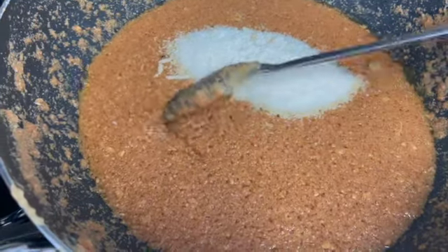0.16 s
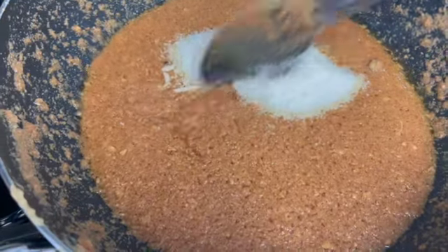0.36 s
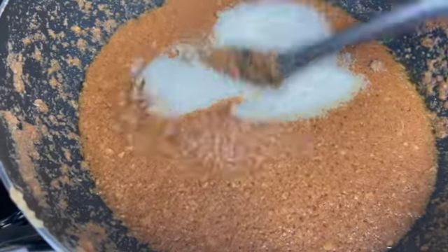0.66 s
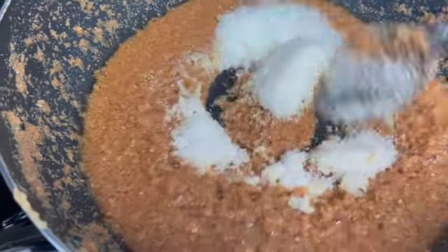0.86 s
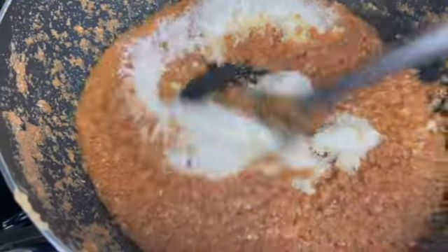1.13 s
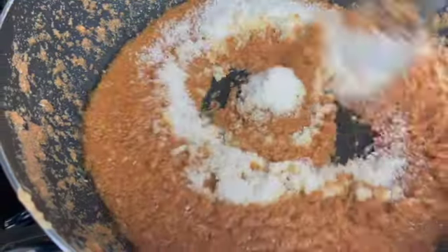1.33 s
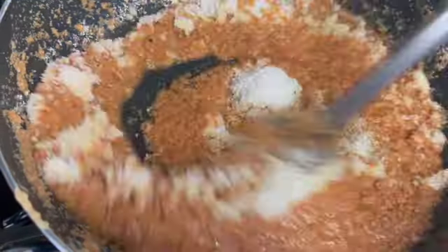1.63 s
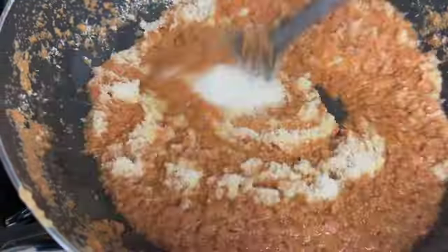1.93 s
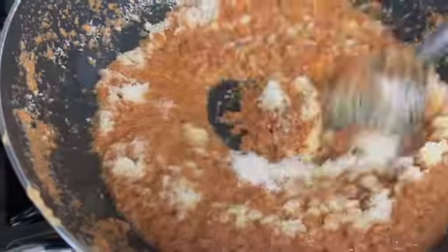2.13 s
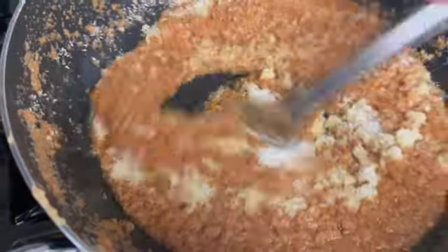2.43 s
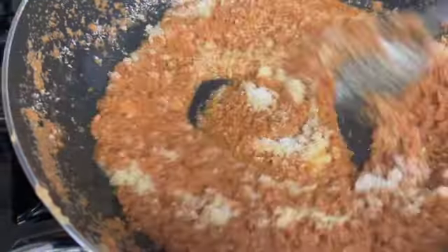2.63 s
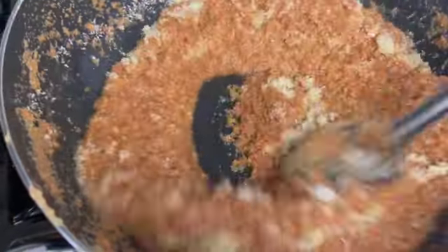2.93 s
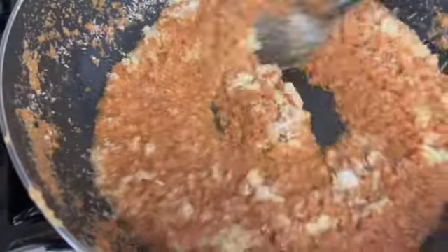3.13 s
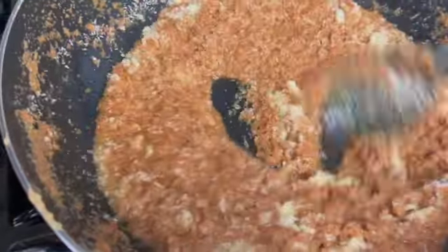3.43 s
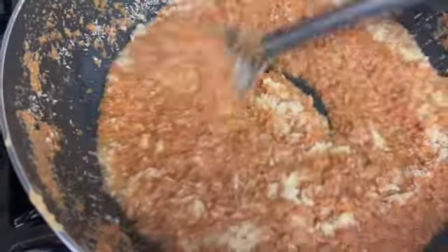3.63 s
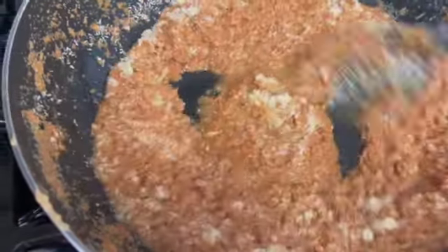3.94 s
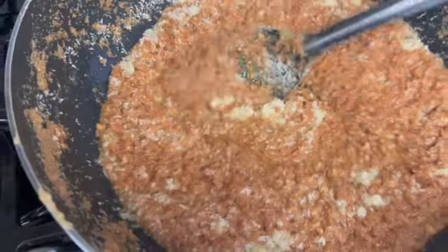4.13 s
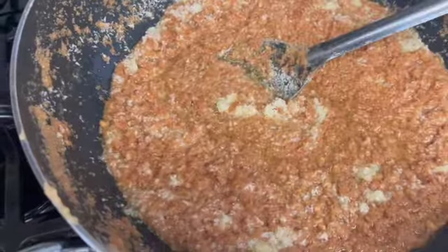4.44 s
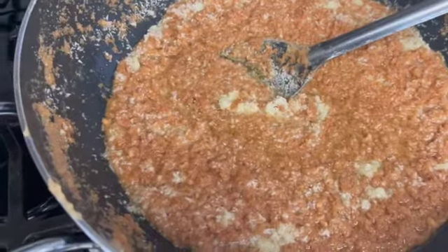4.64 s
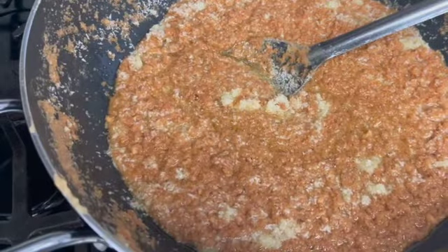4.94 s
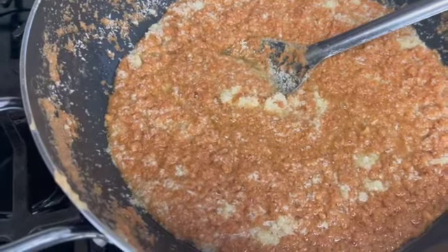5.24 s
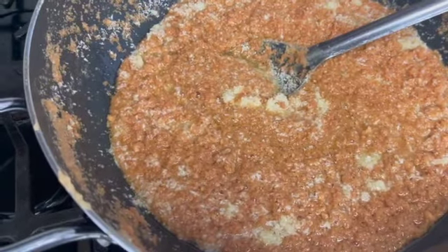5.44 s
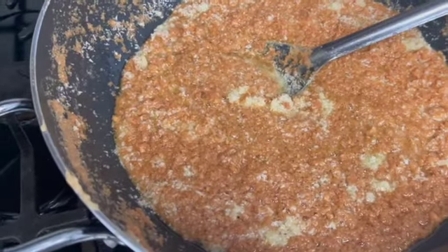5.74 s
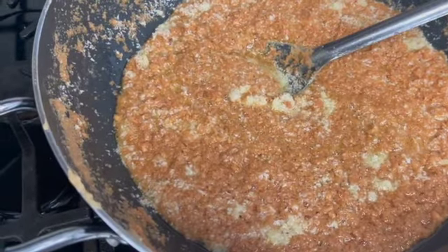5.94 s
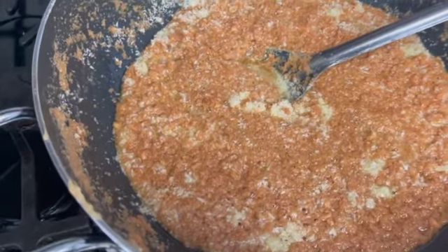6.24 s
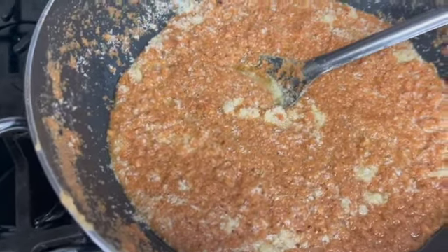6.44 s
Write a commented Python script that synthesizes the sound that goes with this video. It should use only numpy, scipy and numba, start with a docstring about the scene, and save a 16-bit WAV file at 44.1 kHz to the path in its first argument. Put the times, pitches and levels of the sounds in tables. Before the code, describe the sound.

Fat sizzles lightly throughout, with scattered tiny spits, heard close above a frying pan in a kitchen with short wall reflections. At about 0.4 seconds a metal spoon strikes the pan with a ringing clank. From 0.8 to 3.8 seconds it stirs a thick mixture in short, grainy scrapes, strongest around 1.5 seconds, with faint wet pops and a few light ticks. At 4.2 seconds the spoon drops against the pan with the loudest crack, bouncing briefly over a dull stove thud, and the sizzle softens. Another sharp, ringing clank comes at 4.8 seconds, followed by smaller knocks and thuds until 5.2. A knock and short scrape at 6 seconds lead into light clatter and a last bright clack at 6.4. Underneath are a low room rumble and a faint, distant engine drone that swells slightly after 2 seconds.

```python
"""A metal spoon in a frying pan, heard from above on two microphone ports a few centimetres apart.
It stirs a thick mixture that pops wetly, judders over the pan floor, and is dropped and knocked against
pan and stove: the metal cracks and rings, the stove top thuds. Fat sizzles and spits throughout.
The pan sounds wide in the upper mids and comes back off the kitchen walls. Far off, an engine drones
through the walls, under the rumble of the room."""
import sys
import numpy as np
from scipy import signal
from scipy.fft import rfft, irfft, next_fast_len
from scipy.io import wavfile
from scipy.ndimage import uniform_filter1d
from numba import njit

SR = 44100
rng = np.random.default_rng(int(sys.argv[2]) if len(sys.argv) > 2 else 0)


def to_wav(sig):
    """Store sig (one row per channel, or 1-D mono) as 16-bit WAV at the path in sys.argv[1].

    Samples outside -1..1 are clipped; the rate is SR.
    """
    pcm = np.clip(np.atleast_2d(sig), -1, 1) * 32767
    pcm = np.round(pcm).astype(np.int16)
    wavfile.write(sys.argv[1], SR, pcm.T)  # frames by channels


N = 290655

# how hard the fat fries; sizzle and small spits are set against it: t/s, level/dB
FRYING_HEAT = [(0, -47), (.4, -48), (.7, -43), (1.3, -44), (4.15, -46.5), (4.5, -54), (5.9, -50),
               (6.15, -50.5), (6.59, -53.5)]
# spectrum of the sizzle from above the pan: f/Hz, level/dB
SIZZLE_SPECTRUM = [(300, -3.5), (1000, -9), (2000, -11.5), (4500, -13), (6500, -7.5), (8500, -5.5),
                   (10000, -2.5), (10900, 0.5), (11500, -2.5), (12200, -11.5), (14000, -24.5), (16000, -36)]
# the loudest spits of fat: t/s, relative peak/dB
LOUD_SPITS = [(0.7275, -27), (0.834, -32), (0.9672, -27), (1.0133, -30), (1.1322, -25.5), (1.671, -21.5),
              (1.72, -26.5), (2.236, -23.5), (2.9266, -28), (3.2774, -23.5), (3.303, -30), (4.608, -31.5)]
# spectrum of one spit: f/Hz, level/dB
SPIT_SPECTRUM = [(500, -29), (1500, -32), (4000, -4), (7000, -4), (11000, 14.5), (13500, -21), (16000, -15)]
# colour of the hiss and the short diffuse smear that widen the image in the upper mids: f/Hz, level/dB
WIDTH_SPECTRUM = [(600, -6), (1900, -6), (3000, 6), (4400, 10), (4900, 0), (5250, 6), (5900, -20),
                  (7300, 0), (9000, -50)]
# colour of the reflections off the kitchen walls: f/Hz, level/dB
WALL_SPECTRUM = [(100, -27), (250, 12), (500, 10), (1000, 13.5), (5000, 8), (16000, -91)]
# the kitchen's room tone: f/Hz, level/dB
RUMBLE_SPECTRUM = [(20, -23), (36, -10.5), (70, 1), (213, -14.5), (280, -15.5), (628, -40), (1600, -30),
                   (3520, -120)]
# the distant engine: t/s, cycle rate/Hz, level of the third multiple/dB
ENGINE_RUN = [(0, 25.78, -54), (1.0, 26.28, -49.5), (1.75, 26.46, -47.5), (2.2, 26.8, -37),
              (2.55, 26.57, -38.5), (2.75, 26.63, -54), (3.3, 27.8, -47), (4.1, 27.98, -50),
              (4.8, 27.66, -48), (5.1, 26.83, -57), (6.59, 26.68, -88)]
# its other partials: multiple of the cycle rate, mean level/dB
ENGINE_PARTIALS = [(2, -58), (4, -55), (5, -58.5)]
# contacts of the spoon (knocks, bounces and short slides): t/s, crack/dB, contact/ms, tilt/dB per octave,
# two favoured f/Hz, upper ring/dB, lowest ring/dB, share of the free ring time, further favoured f/Hz
SPOON_CONTACTS = [(0.4222, -19, 4.1, -2.5, 5200, 1268, -37, -14, 0.18),
                  (0.4283, -18.5, 20, -3.5, 4400, 2785, -34.5, -4.5, 0.45, 2280, 3740, 6260),
                  (0.483, -30, 60, -5, 3750, 4400, -35, -16.5, 0.3, 2000),
                  (2.538, -32, 7, -1.8, 1760, 3080, -60, -68, 0.34),
                  (2.736, -31.5, 7.7, -3, 940, 580, -56, -62, .25),
                  (3.159, -29.5, 4.23, 0.4, 2700, 2010, -57, -57, 0.29),
                  (3.571, -26, 4.9, -6, 585, 774, -66, -51, 0.22),
                  (4.1715, -4.5, 5.5, -2.2, 1000, 5608, -29, -54, 0.24, 520, 1510, 3370, 6770),
                  (4.2017, -13.5, 6.7, -3.6, 5840, 6770, -35, -53, 0.3, 1900, 1030),
                  (4.2253, -15.5, 6.3, -2.7, 6770, 5900, -42, -52, 0.27, 950),
                  (4.25, -31.5, 35, -5.5, 6230, 6770, -67, -55, .26),
                  (4.271, -23, 5.9, -1.5, 6400, 2000, -57, -60, 0.14),
                  (4.8125, -8, 5.9, -1, 5620, 2280, -26.5, -17, 0.22, 4410, 1500, 490),
                  (4.824, -20.5, 23.6, -5.5, 4410, 6270, -39, -15, 0.45),
                  (4.977, -14, 6, -1.5, 1550, 2290, -33.5, -27, 0.27, 5800, 6260, 3770),
                  (5.092, -31, 26, -6, 785, 1110, -42, -40, 0.3),
                  (5.129, -33, 12, 4, 3860, 4260, -54.5, -42, 0.2),
                  (5.143, -38, 2.8, -12.5, 1267, 554, -47, -65, 0.23),
                  (5.151, -22, 9.6, -6.5, 2277, 1330, -34.5, -52, 0.2),
                  (5.525, -44, 25, 2.5, 2975, 3800, -49, -65, 0.3),
                  (5.9956, -15, 6.4, -2, 1840, 4220, -34.5, -45, 0.18, 1020, 1510, 1700),
                  (6.0493, -28.5, 22, -4, 1750, 4350, -46, -56, 0.29, 450),
                  (6.127, -36.5, 80, -1.5, 4440, 1820, -52, -39, .15),
                  (6.202, -30, 20, -4.5, 3870, 2975, -43, -61, 0.31),
                  (6.211, -23, 18, -1.4, 750, 6600, -30.5, -61, .15),
                  (6.239, -33.5, 69, -1, 2960, 1920, -30.5, -64, .15),
                  (6.3852, -30, 4, -2, 4450, 3040, -62, -67, 0.14),
                  (6.417, -13.5, 4.7, 1, 2970, 6260, -37, -50, 0.3),
                  (6.421, -24, 10.4, -4, 560, 785, -62, -60, .2),
                  (6.445, -33, 88, 2, 2980, 5800, -59, -77, .2)]
# spectrum of a contact's crack, before tilt: f/Hz, level/dB
CRACK_SPECTRUM = [(200, -9), (600, 5.5), (2000, 2), (7000, 4.5), (10500, 17), (12500, 3), (16000, -42)]
# upper modes of the pan: f/Hz, relative level/dB, free t60/s
PAN_MODES = [(545, -9, .1), (1040, -6, .12), (1268, -5, .2), (1510, -4, .17), (1886, -5, .2),
             (2010, -9, .18), (2277, -3, .24), (2792, -6, .3), (2975, -3, .26), (3370, -5, .18),
             (3770, -7, .24), (4415, 3, .28), (5612, -3, .24), (5800, -6, .2), (6260, -4, .17),
             (6768, -6, .17), (7790, -10, .14), (10100, -2, .07)]
# balance of the lowest mode as the microphone drifts across the pan: t/s, left minus right/dB
LOWEST_BALANCE = [(0.5, 6), (4.8, 0)]
# strokes on the pan floor: t/s, length/s, rise/ms, level/dB, rasp above that/dB, bowl resonance/Hz
SPOON_STROKES = [(0.823, 0.13, 41, -37.5, -12.5, 1475), (1.284, 0.17, 5.7, -35.5, -12, 1477),
                 (1.461, 0.18, 21, -32.5, -7.5, 1410), (1.765, 0.083, 16, -33, -19, 1370),
                 (1.979, 0.063, 49, -45, -40, 764), (2.105, 0.12, 20, -47, -20, 1220),
                 (2.409, 0.082, 13, -49, -1, 1090), (2.621, 0.032, 26, -49.5, -20, 900),
                 (3.232, 0.052, 23, -42, -13, 693), (3.647, 0.12, 43, -45, -29, 690),
                 (3.746, 0.05, 9.5, -48.5, -4.5, 600), (4.533, 0.081, 26, -42, -14, 610),
                 (5.454, 0.14, 32, -67.5, 15.5, 1690), (5.992, 0.15, 20, -39.5, -13, 1060)]
# blows taken by the stove top: t/s, level/dB, f/Hz
STOVE_THUDS = [(4.169, -34.5, 128), (4.812, -29, 174), (4.978, -36, 300), (5.162, -28, 90),
               (6.066, -33.5, 88.7)]
# phase between the channels; the treble lags on the right in uneven steps: f/Hz, lead of the left/rad
CHANNEL_LEAD = [(0, 0), (3600, 0), (4480, 1.4), (4820, 3.14), (5050, 3.8), (5450, 5.9), (5750, 6.28),
                (6600, 6.4), (8400, 9.35), (9500, 9.5), (12000, 12.5), (13800, 12.6), (15300, 15.7)]
# balance between the channels: f/Hz, left minus right/dB
CHANNEL_BALANCE = [(120, 0), (400, 2.0), (900, 2.5), (1700, .6), (3800, -0.5), (5800, 0)]

SMALL_SPITS_PER_S, SMALL_SPIT_DB, SMALL_SPIT_SPREAD_DB = 4, 6, 2.5
LOWEST_HZ, LOWEST_T60_S = 825, 0.18  # the pan's lowest mode
GRIP_S = 0.14  # its ring is choked ever faster as the pan settles
MODE_SIDE_SHARE = 0.8  # each upper mode radiates towards one port or the other, up to this share
STROKE_FALL_SHARE, STROKE_FADE_DB = 0.22, -2  # a stroke weakens as it runs
BOWL_SAG = 0.82  # the resonance of the spoon's bowl sinks by this ratio as it fills
TOP_HZ = 15900


def undb(db):
    """Decibels to gain."""
    return 10 ** (np.asarray(db) / 20)


def level(x, db):
    """Scale to an rms level."""
    return x * undb(db) / np.sqrt(np.mean(x ** 2))


def on_log(table, hz):
    """Read an (f/Hz, value) table on a log-frequency axis."""
    f, v = np.transpose(table)
    return np.interp(np.log(hz + 1), np.log(f), v)


def shape(x, gain):
    """Filter by a gain given as a function of frequency."""
    n = next_fast_len(x.shape[-1])
    return irfft(rfft(x, n) * gain(np.fft.rfftfreq(n, 1 / SR)), n)[..., :x.shape[-1]]


def noise(size, spectrum):
    """Noise coloured by an (f/Hz, level/dB) table."""
    return shape(rng.standard_normal(size), lambda hz: undb(on_log(spectrum, hz)))


def curves(table):
    """The columns of a table led by t/s, read at every sample."""
    s, *cols = np.transpose(table)
    return [np.interp(np.arange(N) / SR, s, c) for c in cols]


def walk(rate):
    """Random levels held 1 / rate seconds and smoothed twice."""
    hold = int(SR / rate)
    steps = np.repeat(rng.standard_normal(N // hold + 1), hold)
    return 2.65 * uniform_filter1d(uniform_filter1d(steps, hold), hold)[:N]


def grains(rate, spread_db, decay_ms):
    """Noise gated by random bursts: many small, a few large."""
    hit = rng.random(N) < rate / SR
    size = undb(spread_db * np.minimum(rng.exponential(size=N), 4))
    gate = signal.lfilter([1], [1, -np.exp(-1000 / (decay_ms * SR))], hit * size)
    return level(gate * rng.standard_normal(N), 0)


@njit
def bandpass(x, hz, q):
    """Band-pass with a moving centre, gain 1 at the centre."""
    y, band, low = np.empty(len(x)), 0., 0.
    for i in range(len(x)):
        g = np.tan(np.pi * hz[i] / SR)
        v = (band + g * (x[i] - low)) / (1 + g * (g + 1 / q))
        band, low, y[i] = 2 * v - band, low + 2 * g * v, v / q
    return y


def add(out, x, s):
    """Mix a short sound in at s seconds."""
    i = int(round(s * SR))
    out[..., i:i + x.shape[-1]] += x[..., :N - i]


def frying():
    """Fat below the microphone: a dense hiss of tiny bubbles, sparser crackles and single spits."""
    bubbles = rng.standard_normal(N) * undb(0.85 * walk(14))
    crackles = undb(-3) * grains(rate=180, spread_db=1.5, decay_ms=1)
    sizzle = shape(bubbles + crackles, lambda hz: undb(on_log(SIZZLE_SPECTRUM, hz)))
    heat_db = curves(FRYING_HEAT)[0]
    out = level(sizzle, 3.1) * undb(heat_db)
    t = np.arange(SR // 50) / SR
    gaps, sizes = rng.exponential(size=(60, 2)).T
    small_spits = [(s, heat_db[int(s * SR)] + SMALL_SPIT_DB + SMALL_SPIT_SPREAD_DB * size)
                   for s, size in zip(np.cumsum(gaps) / SMALL_SPITS_PER_S, sizes) if s < N / SR]
    for s, db in LOUD_SPITS + small_spits:
        spit = noise(len(t), SPIT_SPECTRUM) * np.exp(-t / 0.0016)
        add(out, undb(db + 9) * spit / np.abs(spit).max(), s)
    return out


def wide_hiss():
    """A hiss around 3-5 kHz, unrelated in left and right, following the sizzle's level."""
    return level(noise((2, N), WIDTH_SPECTRUM), -11) * undb(curves(FRYING_HEAT)[0])


def diffuse_tail(x, spectrum, t60, db):
    """Spread a sound into a decaying cloud, a separate one in each channel."""
    t = np.arange(SR // 2) / SR
    fade = np.exp(-np.log(1000) * t / t60)
    cloud = noise((2, len(t)), spectrum) * fade * undb(db) / np.sqrt(np.sum(fade ** 2))
    return signal.fftconvolve(x[None], cloud, axes=1)[:, :N]


def kitchen_rumble():
    """Room tone: low noise that slowly swells and sinks."""
    return level(noise(N, RUMBLE_SPECTRUM), -49) * undb(1.7 * walk(1.26))


def distant_engine():
    """Multiples of the engine's cycle waver on their way through the walls; the third booms indoors."""
    cycle_hz, boom_db = curves(ENGINE_RUN)
    phase = 2 * np.pi * np.cumsum(cycle_hz) / SR
    out = undb(boom_db) * np.sin(3 * phase)
    for multiple, db in ENGINE_PARTIALS:
        gain = undb(db + 0.22 * (boom_db - boom_db.mean()) + 1.5 * walk(4.05))
        out += gain * np.sin(multiple * phase + 1.52 * walk(3.6))
    return np.sqrt(2) * out


def crack(push, favoured, tilt_db, db):
    """A burst of noise while spoon and metal touch, peaking at the favoured resonances."""
    def tone(hz):
        peaks = sum(1.65 / (1 + (12 * (hz / centre - 1)) ** 2) for centre in favoured)
        return undb(on_log(CRACK_SPECTRUM, hz) + tilt_db * np.log2((hz + 50) / 2000)) * (1 + peaks)
    return push * level(shape(rng.standard_normal(len(push)), tone), db)


def ring(hz, t60, push, t, turn):
    """A mode builds up while the contact lasts, then dies away; turn is its phase in cycles."""
    swell = signal.lfilter([1], [1, -np.exp(-np.log(1000) / (t60 * SR))], push) / push.sum()
    return swell * np.sin(2 * np.pi * (hz * t + turn))


def spoon_contacts():
    """Each contact cracks and sets the pan ringing, damped by food or hand: a mono and a stereo part."""
    centre, stereo, t = np.zeros(N), np.zeros((2, N)), np.arange(SR // 2) / SR
    sides = np.array([[1], [-1]])
    chatter = undb(2 * walk(150))  # the loose spoon chatters on the metal and roughens the upper modes
    for s, crack_db, contact_ms, tilt_db, hz1, hz2, upper_db, lowest_db, share, *more in SPOON_CONTACTS:
        favoured = [hz1, hz2] + more
        # the place of contact picks out some modes and pulls them off pitch
        pulled = {min(PAN_MODES, key=lambda mode: abs(np.log(mode[0] / hz)))[0]: hz for hz in favoured}
        push = (1 - np.exp(-t / 0.00055)) * np.exp(-(1000 * t / contact_ms) ** 0.83)
        add(centre, crack(push, favoured, tilt_db, crack_db), s)
        draws = rng.random((len(PAN_MODES), 4))
        for (hz, db, t60), (turn, twin_turn, detune, aim) in zip(PAN_MODES, draws):
            gain = undb(upper_db + db + tilt_db * np.log2(hz / 2000) + 12 * (hz in pulled))
            hz = pulled.get(hz, hz)
            main = ring(hz, share * t60, push, t, turn)
            # handle and rivets split each mode: a short-lived twin beats against it
            twin = ring(hz * (1 + 0.021 * (detune - .5)), 0.5 * share * t60, push, t, twin_turn)
            start = int(twin_turn * (N - len(t)))
            mode = chatter[start:start + len(t)] * gain * (main + 2.4 * twin)
            add(centre, mode, s)
            add(stereo, sides * MODE_SIDE_SHARE * (2 * aim - 1) * mode, s)
        # a bounce feeds the lowest mode in step with what already rings
        lowest = ring(LOWEST_HZ, LOWEST_T60_S, push, t, LOWEST_HZ * s) * np.exp(-(t / GRIP_S) ** 2)
        balance_db = np.interp(s, *np.transpose(LOWEST_BALANCE))
        add(stereo, undb(lowest_db + sides * balance_db / 2) * lowest, s)
    return centre, stereo


def squelch(start_s=0.46, end_s=4.1, db=-56.5):
    """The stirred mixture pops and grits, its pitch jumping 60 times a second."""
    hold = SR // 60
    hz = np.repeat(450 * 2 ** (3 * rng.random(N // hold + 1) ** 2), hold)[:N]
    pops = bandpass(grains(rate=50, spread_db=3.5, decay_ms=9), hz, 2.2)
    stirring = curves([(start_s - .1, 0), (start_s, 1), (end_s - .1, 1), (end_s, 0)])[0]
    return level(pops, db) * stirring


def spoon_scrapes():
    """The spoon judders over the pan floor: a grainy rub in its bowl, a rasp in the pan's modes."""
    rub = grains(rate=2500, spread_db=1.5, decay_ms=1.5)
    hz, t = np.full(N, 1300.), np.arange(N) / SR
    bowl_gain, rasp_gain = np.zeros(N), np.zeros(N)
    for s, length, rise_ms, db, rasp_db, bowl_hz in SPOON_STROKES:
        rise = 1000 * (t - s) / rise_ms
        fall = (s + length - t) / (STROKE_FALL_SHARE * length)
        fade = undb(STROKE_FADE_DB * np.clip((t - s) / length, 0, 1))
        contact = np.clip(np.minimum(rise, fall), 0, 1) * fade
        bowl_gain += contact * undb(db)
        rasp_gain += contact * undb(db + rasp_db)
        hz = np.where(contact > 0, np.interp(t, [s, s + length], [bowl_hz, BOWL_SAG * bowl_hz]), hz)
    skirt = bandpass(bandpass(rub, hz, 1.2), hz, 1.2)
    bowl = bandpass(rub, hz, 11.) + .9 * bandpass(rub, .62 * hz, 8.) + .35 * skirt
    modes = sum(undb(db) * bandpass(rub, np.full(N, float(f)), 75.) for f, db, _ in PAN_MODES[3:16])
    grit_hz = np.full(N, 3500.)
    grit = bandpass(bandpass(rub, grit_hz, 0.38), grit_hz, 0.38)
    rasp = level(modes, -0.94) + level(grit, 1)
    pressure = undb(.7 * walk(60))
    return pressure * (bowl_gain * level(bowl / np.sqrt(hz), 0) + rasp_gain * rasp)


def stove_thuds(t60=0.24):
    """The stove top takes a blow and answers with one low mode."""
    out, t = np.zeros(N), np.arange(SR // 2) / SR
    push = np.exp(-t / 0.0014)
    for s, db, hz in STOVE_THUDS:
        add(out, undb(db) * ring(hz, t60, push, t, 0), s)
    return out


def scene():
    """The pan close by, widened by a short smear and the walls; rumble and engine in the centre."""
    clatter, stereo_ring = spoon_contacts()
    near = clatter + spoon_scrapes() + squelch() + frying() + stove_thuds()
    smear = diffuse_tail(near, WIDTH_SPECTRUM, t60=0.035, db=-18)
    walls = diffuse_tail(near, WALL_SPECTRUM, t60=0.51, db=-23)
    return near + stereo_ring + smear + walls + kitchen_rumble() + wide_hiss() + distant_engine()


def record(dry):
    """The treble lags on the right in uneven steps, mids lean left; peaks are rounded, the top is cut."""
    def left_gain(hz):
        lead = np.interp(hz, *np.transpose(CHANNEL_LEAD))
        return undb(on_log(CHANNEL_BALANCE, hz) / 2) * np.exp(.5j * lead)
    left = shape(dry[0], left_gain)
    right = shape(dry[1], lambda hz: 1 / left_gain(hz))
    top_cut = signal.ellip(10, .2, 90, TOP_HZ, fs=SR, output="sos")
    return signal.sosfilt(top_cut, np.tanh([left, right]))


dry = scene()
out = record(dry)
to_wav(out)
```